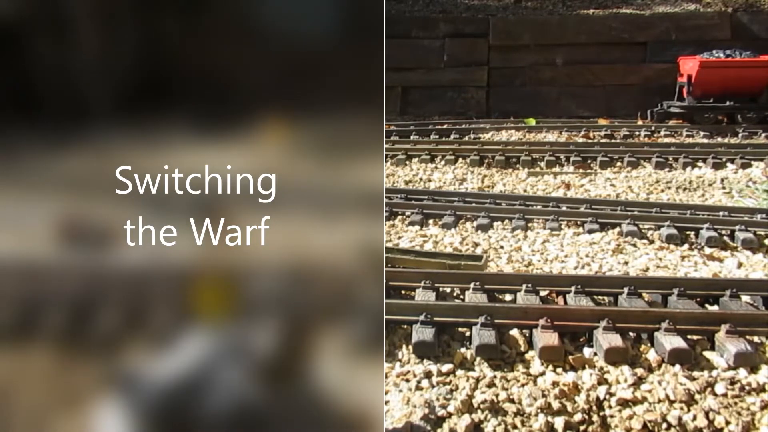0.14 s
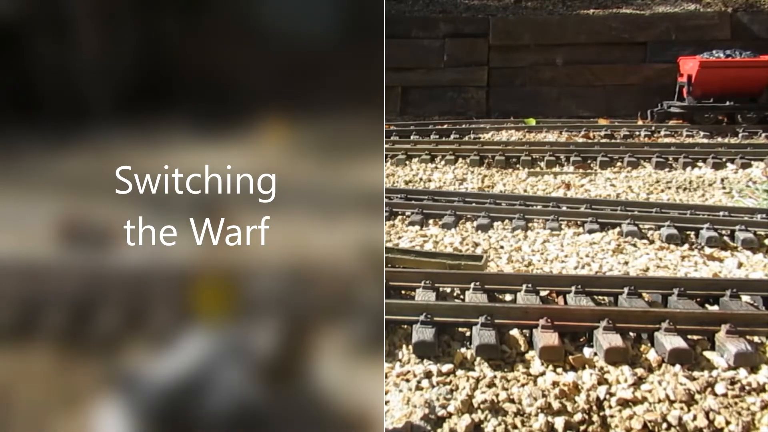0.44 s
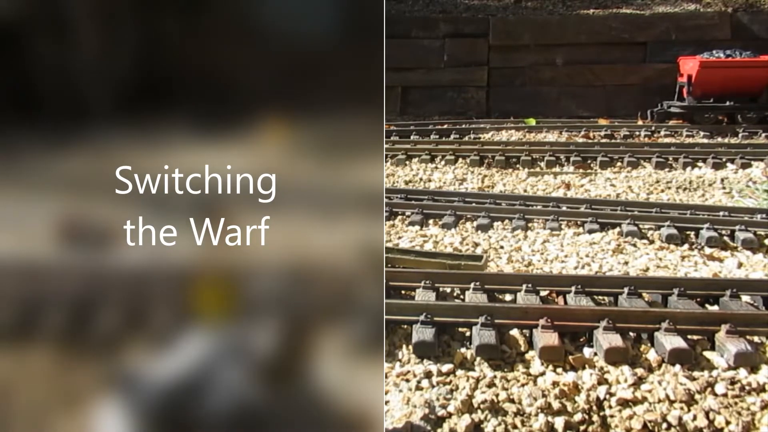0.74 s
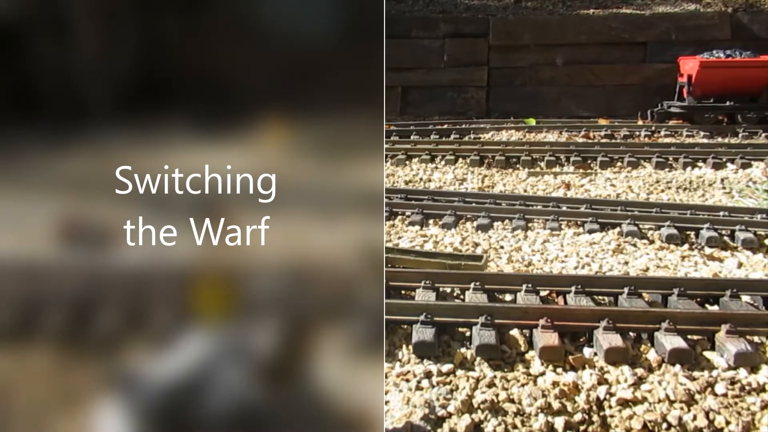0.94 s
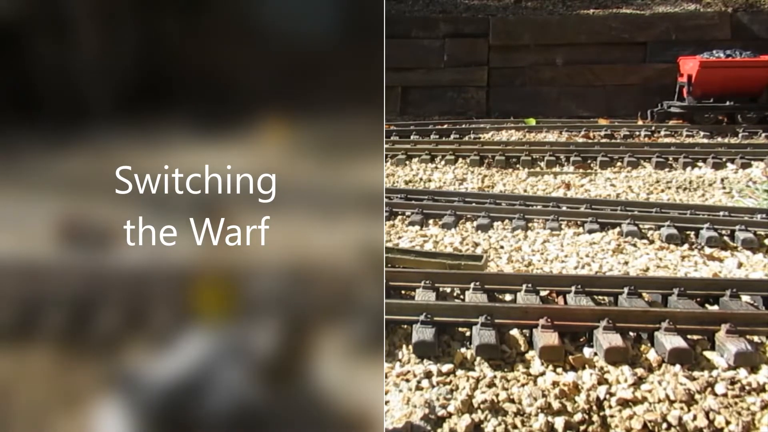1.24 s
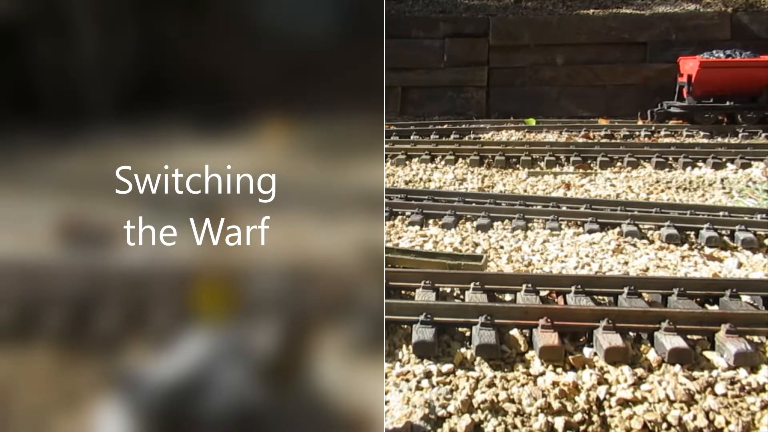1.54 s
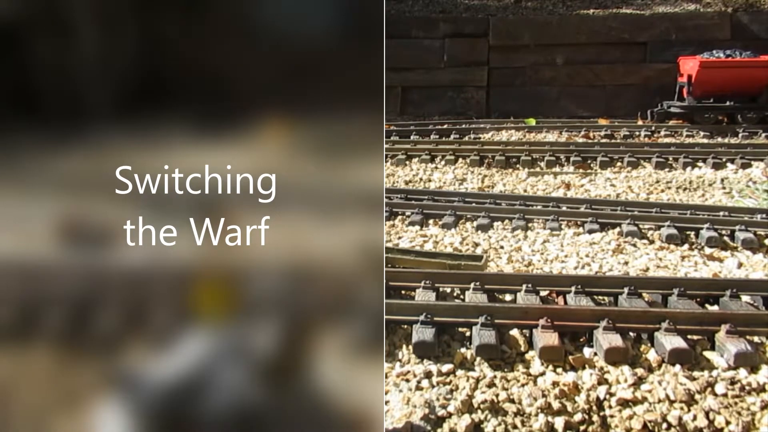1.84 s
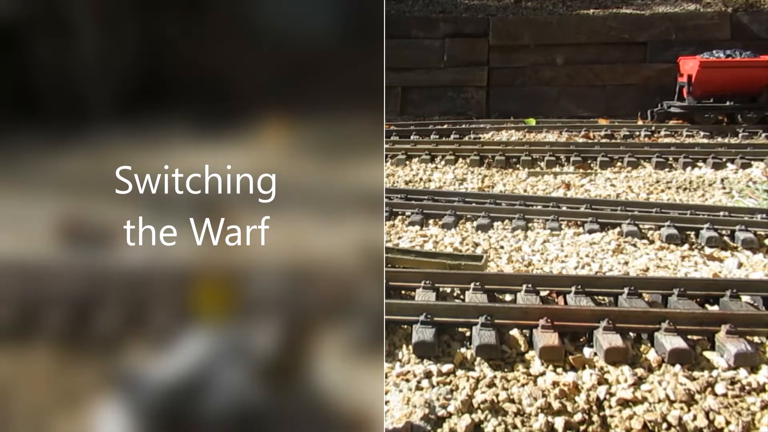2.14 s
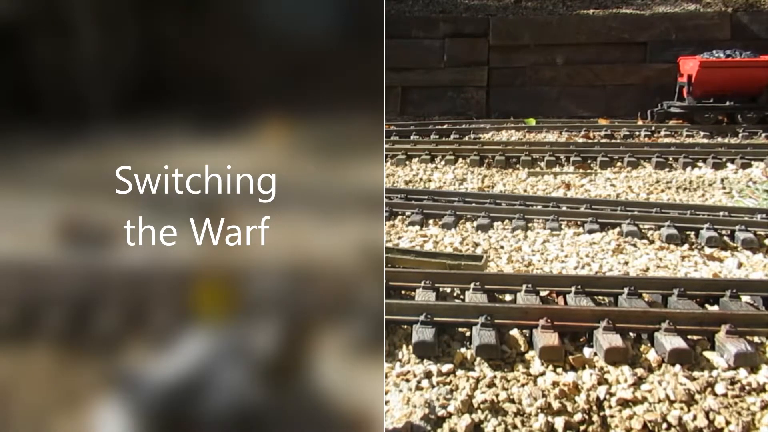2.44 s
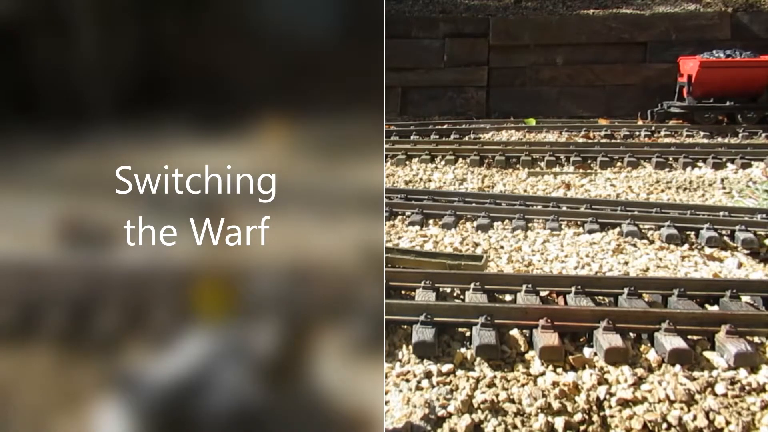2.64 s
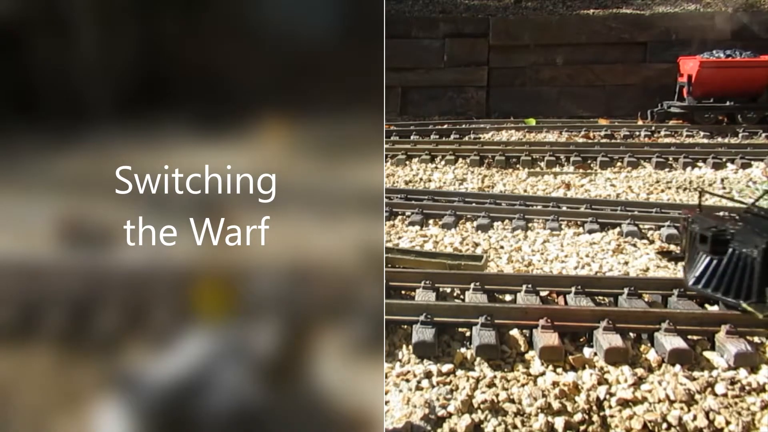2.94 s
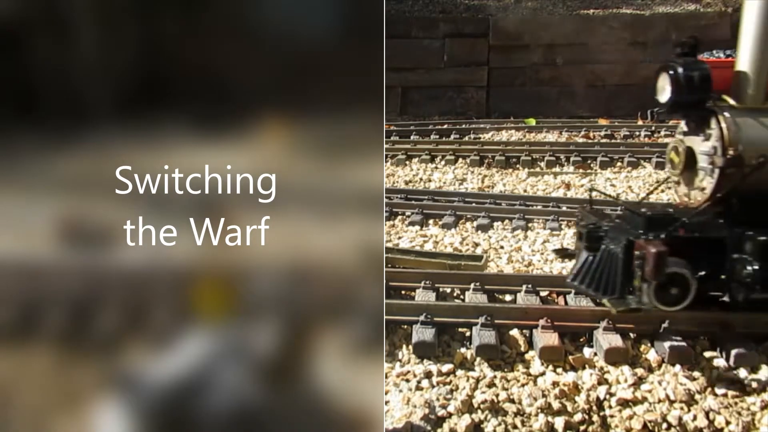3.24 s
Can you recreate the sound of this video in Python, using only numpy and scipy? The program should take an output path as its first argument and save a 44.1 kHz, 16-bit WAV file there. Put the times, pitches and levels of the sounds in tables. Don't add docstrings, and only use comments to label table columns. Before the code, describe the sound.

Small steam locomotive simmers softly, spits spray, then chuffs rapidly closer with growing loudness

```python
import sys
import numpy as np
from scipy import signal
from scipy.fft import rfft, irfft
from scipy.io import wavfile
from scipy.ndimage import uniform_filter1d, minimum_filter1d

SR = 44100
rng = np.random.default_rng(int(sys.argv[2]) if len(sys.argv) > 2 else 0)


def boost(x):
    u = np.asarray(x, float) / 20
    return 10 ** u


def wav_record(signal):
    frames = np.transpose(np.atleast_2d(signal))
    bounded = np.clip(frames, -1, 1)
    quanta = np.round(bounded * 32767).astype(np.int16)
    wavfile.write(sys.argv[1], SR, quanta)


N = 149940
TIME = np.arange(N) / SR

# start in seconds, peak level in dB, rise in seconds, hold in seconds,
# brightness in dB.
PUFFS = [(0.795, -8.5, 0.0096, 0.036, -0.6), (0.917, -5.5, 0.0039, 0.037, 0),
         (1.07, -7.5, 0.0034, 0.024, -0.2), (1.205, -7.5, 0.0088, 0.039, -0.5),
         (1.31, -6.5, 0.0071, 0.034, 0), (1.433, -5.5, 0.0032, 0.021, -.2),
         (1.576, -8, 0.0055, 0.043, -0.5), (1.714, -7.5, 0.0051, 0.031, -1.5),
         (1.852, -3, 0.017, 0.015, -1.3), (1.982, -4, 0.0037, 0.027, 0), (2.154, -6, 0.0088, 0.036, -1.5),
         (2.321, -6, 0.012, 0.052, -2.5), (2.466, -4.5, 0.0021, 0.058, 0.4), (2.633, -2, 0.006, 0.029, 0),
         (2.812, -3, 0.0038, 0.027, .1), (2.971, -5.5, 0.0052, 0.045, -1), (3.087, -2, 0.0026, 0.03, 0.7),
         (3.216, -1.5, 0.0041, 0.024, 0.6), (3.349, -3.5, 0.0012, 0.029, 0.5)]
SPIT_SHARE = 0.45


def rms_one(x):
    return x / np.sqrt(np.mean(x ** 2) + 1e-20)


def drift(rate):
    r = np.exp(-80 * np.pi * rate / SR)
    slow = signal.lfilter([1], [1, -2 * r, r * r], rng.standard_normal(N // 40 + 2002))[2000:]
    return np.interp(np.arange(N) / 40, np.arange(len(slow)), rms_one(slow))


def bandpass(x, hz):
    return signal.sosfilt(signal.butter(2, hz, "band", fs=SR, output="sos"), x)


def banded(source, spectrum, patchy_db, tilt_db=0):
    out = 0
    edges = 22 * 2 ** np.arange(0, 9.6, 0.5)
    hz, db = np.transpose(spectrum)
    for k, (low, high) in enumerate(zip(edges, edges[1:])):
        mid = np.sqrt(low * high)
        if hz[0] / 1.5 < mid < hz[-1] * 1.5:
            band = bandpass(source[k % 2], [low, high])
            level = np.interp(np.log(mid), np.log(hz), db)
            lift = tilt_db * np.clip(np.log2(mid / 4000), -1, 1)
            out = out + band * boost(level + lift + patchy_db * drift(18.6))
    return out


def peaks(x, table):
    for hz, width, db in table:
        a, w = boost(db / 2), 2 * np.pi * hz / SR
        q = np.sin(w) * width / hz / 2
        middle = -2 * np.cos(w)
        x = signal.lfilter([1 + q * a, middle, 1 - q * a], [1 + q / a, middle, 1 - q / a], x)
    return x


def chimney(x):
    # centre in Hz, width in Hz, lift in dB.
    far_colour = [(923, 140, 10), (1102, 210, -12), (1570, 450, 10.5), (2032, 240, 11), (2655, 43, 12),
                  (3256, 56, 13.5), (3843, 990, 16.5), (6800, 820, 15), (9300, 2500, 10.5),
                  (10700, 2900, -10.5), (14500, 1400, 6.5), (12700, 600, 5), (2340, 130, -9),
                  (5350, 340, -6.5)]
    near_colour = [(1010, 220, 2.5), (1200, 100, -23.5), (1580, 288, 13), (1895, 183, -15.5),
                   (2102, 405, 11), (3344, 840, 4.5), (3777, 518, 17), (6520, 1080, 13.5),
                   (7200, 240, -1.5), (9196, 1000, 18), (11420, 4170, -17), (14500, 1600, 2),
                   (13200, 700, -1), (13900, 500, 3), (7850, 890, -10), (6790, 120, -8), (2590, 110, -3)]
    near = np.clip(np.interp(TIME, (0.61, 2.34), [0, 1]) + 0.19 * drift(5), 0, 1)
    return (1 - near) * peaks(x, far_colour) + near * peaks(x, near_colour)


def wet_steam(share):
    spits_per_s, spread_db = 600, 3
    sizes = boost(spread_db * np.minimum(rng.exponential(1, N), 2.5)) * rng.choice([-1, 1], N)
    spits = rms_one(sizes * (rng.random(N) < spits_per_s / SR))
    return rng.standard_normal((2, N)) + share * spits


def whistle(curve, hz, width_hz):
    s, db = np.transpose(curve)
    r = np.exp(-np.pi * width_hz / SR)
    poles = [1, -2 * r * np.cos(2 * np.pi * hz / SR), r * r]
    once = signal.lfilter([1, 0, -1], poles, rng.standard_normal(N))
    tone = signal.lfilter([1, 0, -1], poles, once)
    return rms_one(tone) * boost(np.interp(TIME, s, db, left=-120, right=db[-1]))


def garden():
    # frequency in Hz, level in dB per Hz.
    rumble = [(15, -44), (25, -10), (80, -2.5), (161, -1), (289, -6), (484, -8.5), (628, -8.5), (1200, -14),
              (1560, -44), (2640, -120)]
    return boost(-47.5) * rms_one(banded(rng.standard_normal((2, N)), rumble, patchy_db=1.2))


def valve():
    # time in seconds, level in dB.
    song = [
        (.3, -85),
        (.37, -64),
        (.43, -67),
        (.5, -85),
    ]
    return whistle(song, 13520, width_hz=120)


def pipe_hum():
    # time in seconds, level in dB.
    hum = [(.44, -60), (.53, -43), (.58, -52), (.66, -44), (.74, -40), (.84, -42), (.89, -56), (.945, -41),
           (1.0, -60)]
    return whistle(hum, 970, width_hz=60)


def gland():
    # time in seconds, level in dB.
    sizzle = [(.6, -72), (1.0, -62), (2.0, -55), (2.35, -54), (2.7, -51), (2.9, -55), (3.15, -50),
              (3.4, -55)]
    return whistle(sizzle, 14100, width_hz=900)


def mist():
    # time in seconds, level in dB.
    haze = [(.6, -80), (1.0, -66), (1.5, -58), (2.0, -59), (2.4, -58), (3.0, -56), (3.4, -53)]
    return whistle(haze, 11400, width_hz=3000)


def leak():
    # time in seconds, level in dB.
    seep = [(0.0, -35.5), (0.66, -35), (0.85, -34), (1.06, -32.5), (1.16, -32.5), (1.69, -30), (1.86, -29),
            (2.84, -29), (3.17, -19.5), (3.4, -26.5)]
    # frequency in Hz, level in dB per Hz.
    hiss_spectrum = [(200, -28), (500, -9.5), (1200, -6.5), (3000, -1.7), (5000, -11.5), (8000, -11),
                     (11000, -7), (15000, -18.5)]
    # centre in Hz, width in Hz, lift in dB.
    resting = [(946, 110, 9.5), (1180, 140, -14), (1435, 220, 8.5), (2070, 200, 8.5), (2800, 86, 4),
               (3637, 810, 8.5), (3940, 570, 8.5), (4980, 200, 6.5), (6860, 880, 7), (4460, 710, 2.5),
               (8900, 1100, 6.5), (10550, 1500, -14)]
    resting_top = [(13550, 250, 5), (14500, 1300, -6), (5500, 900, -4)]
    working_top = [(5500, 1100, 2), (7800, 1200, 0), (1930, 800, 3)]
    s, db = np.transpose(seep)
    raw = banded(rng.standard_normal((2, N)), hiss_spectrum, patchy_db=2.4)
    at_rest = rms_one(peaks(peaks(raw, resting), resting_top))
    at_work = rms_one(peaks(chimney(raw), working_top))
    working = np.interp(TIME, (0.63, 1), [0, 1])
    hiss = (1 - working) * at_rest + working * at_work
    coarse = TIME[::32]
    shut = np.sum(np.exp(-((coarse - np.array(PUFFS)[:, :1] + 0.021) / 0.025) ** 2), axis=0)
    return hiss * boost(np.interp(TIME, s, db) - 3.2 * np.interp(TIME, coarse, shut))


def cocks():
    # start in seconds, length in seconds, level in dB.
    bursts = [
        (0.51, 0.033, -31.5),
        (0.634, .015, -31),
        (0.649, 0.05, -25.5),
        (0.701, 0.045, -25),
        (0.75, 0.034, -27.5),
    ]
    # frequency in Hz, level in dB per Hz.
    spray_spectrum = [(200, -20), (500, -2), (1200, -1), (3000, -2.5), (5000, -2), (7000, -1.5),
                      (11000, -9.5), (15000, -9)]
    # centre in Hz, width in Hz, lift in dB.
    pipe_notes = [(800, 250, -4), (6900, 900, -4), (6500, 200, 4), (8300, 1500, 3)]
    edge_s = 0.0085
    s, length, db = np.transpose(bursts)[:, :, None]
    gate = (np.tanh((TIME - s) / edge_s * 2) - np.tanh((TIME - s - length) / edge_s)) / 2
    level = np.sum(boost(db) * np.maximum(gate, 0), axis=0)
    steam = banded(wet_steam(1.5), spray_spectrum, patchy_db=0.3)
    spray = rms_one(peaks(chimney(steam), pipe_notes))
    return spray * level * boost(2.6 * drift(110))


def thuds():
    # start in seconds, peak level in dB.
    lumps = [(0.94, -30), (1.323, -29.5), (1.441, -32), (1.725, -22), (1.983, -26), (2.16, -22.5),
             (2.478, -24), (2.641, -22), (2.819, -16.5), (2.975, -22), (3.091, -39), (3.35, -17)]
    s, db = np.transpose(lumps)[:, :, None]
    age = np.maximum(TIME - s, 0) / 0.0019
    low = bandpass(rng.standard_normal(N), (422, 1180))
    return rms_one(low) * np.sum(boost(db - 12) * age * np.exp(1 - age), axis=0)


def drops():
    # time in seconds, peak level in dB.
    water = [(.528, -18), (.658, -14), (.703, -19), (.72, -20), (.737, -18), (.756, -14), (.761, -11),
             (.920, -10), (1.084, -11), (1.587, -9), (1.725, -11), (1.843, -11), (2.163, -9), (1.202, -14),
             (1.238, -14), (2.339, -10), (2.667, -13), (2.823, -7), (3.351, -12)]
    clicks = np.full(N, 1e-18)
    for s, db in water:
        clicks[int(s * SR)] = boost(db)
    cracks = chimney(bandpass(clicks, (2500, 9500)))
    return 0.91 * cracks * clicks.max() / np.abs(cracks).max()


def surges():
    # time in seconds, gain in dB, half width in seconds.
    slugs = [(.935, 1.5, .005), (1.076, -3, .004), (1.196, -4, 0.0045), (1.204, 3, 0.0047),
             (1.58, -0.5, .004), (1.709, -4, .004), (2.326, 1, .004), (2.463, -1, 0.0043),
             (1.975, 4.5, .005), (1.237, -2.5, 0.0036), (1.312, 3, .003), (1.449, 3.5, .003),
             (1.087, -2, .003), (1.86, 5, 0.0065), (1.587, 0.5, .003), (1.716, 2.5, 0.0035),
             (1.88, -8.5, 0.0058), (1.92, -3.5, 0.0087), (1.996, 2.5, 0.0077), (2.024, -2, 0.019),
             (2.078, 4, 0.0044), (2.184, 4, 0.0024), (2.331, 3.5, 0.0022), (2.34, 2, 0.0018),
             (2.361, 1.5, 0.0035), (2.398, 2.5, 0.0073), (2.639, 2, 0.0044), (2.667, 3.5, .003),
             (2.825, 2.5, 0.0033), (2.906, -5, .004), (2.999, 4, 0.0051), (3.019, 6, 0.0045),
             (3.111, 0, 0.0024), (3.116, -5, .003), (3.213, 7, 0.0025), (3.223, 4.5, 0.0026),
             (3.25, 4.5, 0.001), (3.343, -2, .005), (3.351, 1.5, 0.0036), (3.375, 5, 0.0028)]
    coarse = TIME[::16]
    s, db, width = np.transpose(slugs)[:, :, None]
    bumps = db * np.exp(-((coarse - s) / np.maximum(width, 0.001)) ** 2)
    return boost(np.interp(TIME, coarse, np.sum(bumps, axis=0)))


def puff_shape(fall_db_per_s, held):
    crest_db = 15
    coarse = TIME[::32]
    s, db, rise, hold, _ = np.transpose(PUFFS)[:, :, None]
    swell = 0.5 + 0.5 * np.tanh((coarse - s) / np.maximum(rise, 0.001) / 2)
    fall = fall_db_per_s * np.maximum(coarse - s - held * hold, 0)
    shape = swell * boost(db - crest_db - fall)
    return np.interp(np.arange(N) / 32, np.arange(len(coarse)), np.sqrt(np.sum(shape ** 2, axis=0)))


def exhaust():
    # frequency in Hz, level in dB per Hz.
    jet_spectrum = [(200, -16), (500, -19), (1200, -2.5), (3000, 1.7), (5000, -9.5), (8000, -11),
                    (11000, -4), (15000, -10.5)]
    blast_spectrum = [(200, -35), (500, -11), (1200, 0), (3000, 1), (5000, 1), (8000, -6.5), (11000, 2.5),
                      (15000, -13)]
    s, bright = np.array(PUFFS)[:, 0], np.array(PUFFS)[:, 4]
    current = np.clip(np.searchsorted(s - 0.02, TIME) - 1, 0, None)
    tilt = uniform_filter1d(bright[current], size=400)
    jet = rms_one(chimney(banded(wet_steam(SPIT_SHARE), jet_spectrum, patchy_db=1, tilt_db=tilt)))
    blast = rms_one(chimney(banded(wet_steam(SPIT_SHARE), blast_spectrum, patchy_db=1, tilt_db=tilt)))
    jet = jet * puff_shape(140.5, held=0.74) * boost(1.04 * drift(45))
    return jet + blast * puff_shape(306, held=0.7)


def scene():
    around = garden() + cocks() + thuds()
    tones = valve() + pipe_hum() + gland() + mist()
    engine = leak() + drops() + exhaust() * surges()
    return (around + tones + engine)[None]


def freeze(x, s, depth):
    half = int(0.019 * SR)
    part = slice(int(s * SR) - half, int(s * SR) + half)
    window = np.hanning(2 * half)
    lines = rfft(x[part] * window)
    hz = np.arange(len(lines)) * SR / (2 * half)
    size = np.abs(lines)
    top = -minimum_filter1d(-size, size=19)
    stands_out = (size >= top) & (size > 1.55 * uniform_filter1d(size, size=81))
    kept = stands_out & (hz < 9800) & (hz > 400)
    tones = irfft(lines * kept, 2 * half)
    tones *= boost(-2) * np.std(x[part]) / (np.std(tones) + 1e-12)
    fade = np.minimum(depth * window ** 0.8, 0.999)
    out = x.copy()
    out[part] = np.sqrt(1 - fade ** 2) * x[part] + fade * tones
    return out


def roll_off(x):
    return signal.sosfilt(signal.butter(12, 16120, fs=SR, output="sos"), x)


def record(dry):
    # time in seconds, depth (1 = full).
    freezes = [(.091, 1.05), (.136, 1.03), (.603, 1.06), (1.609, 1.0), (1.777, .99), (1.967, 1.0),
               (2.567, .985), (2.8, .99), (3.142, 1.0)]
    x = dry[0]
    for s, depth in freezes:
        x = freeze(x, s, depth)
    x = signal.sosfilt(signal.ellip(12, 0.5, 60, 14980, fs=SR, output="sos"), x)
    return roll_off(x[None])


dry = scene()
out = record(dry)
wav_record(out)
```